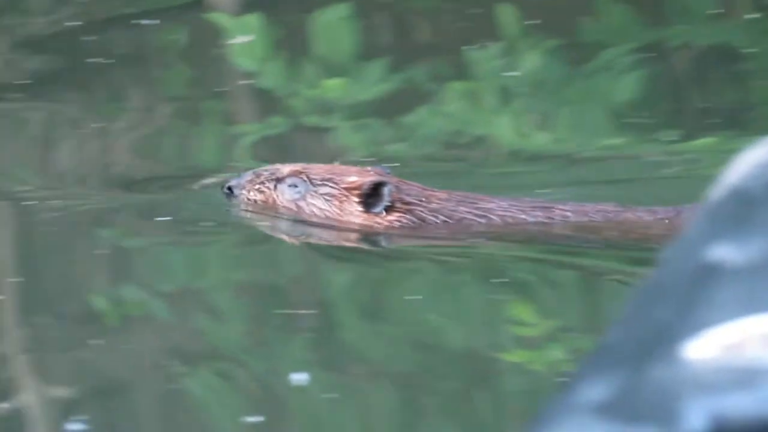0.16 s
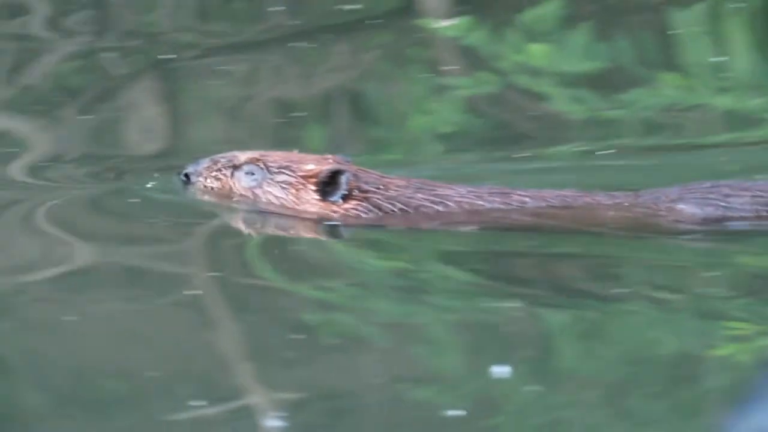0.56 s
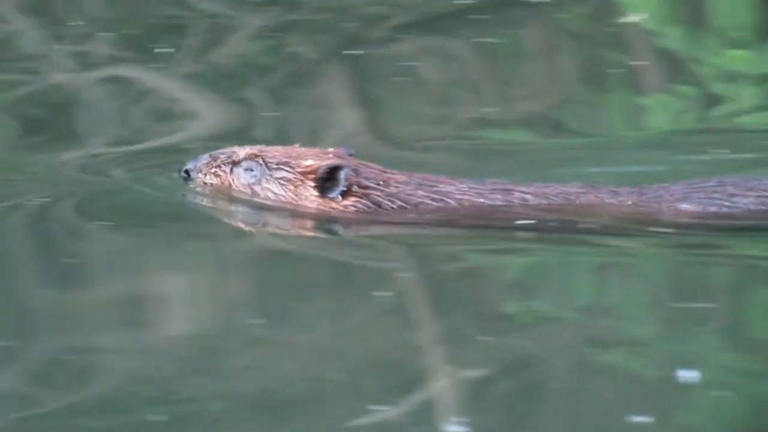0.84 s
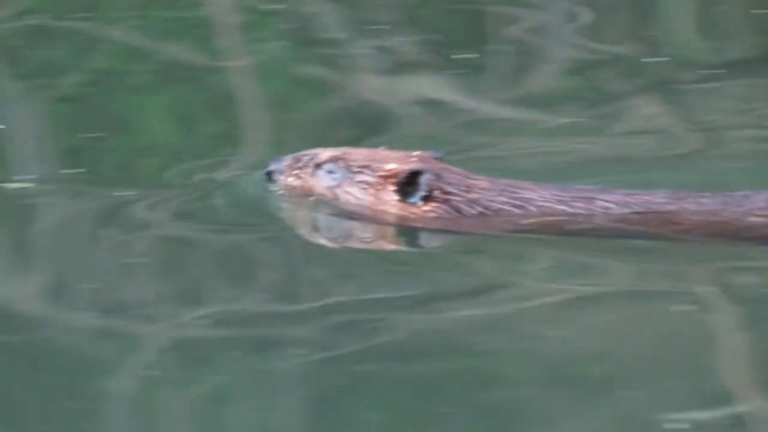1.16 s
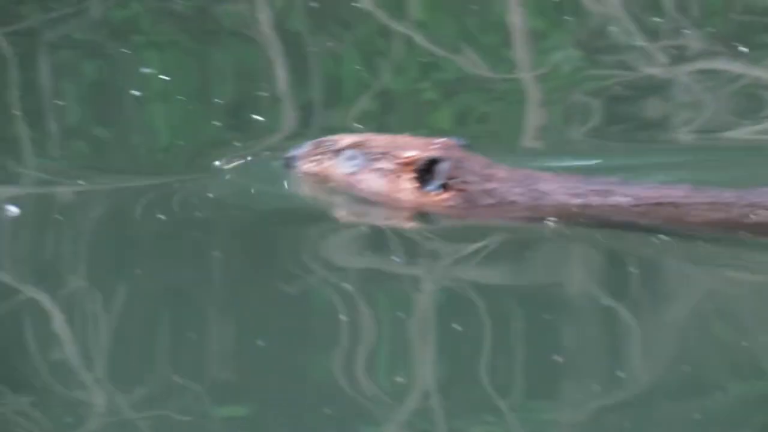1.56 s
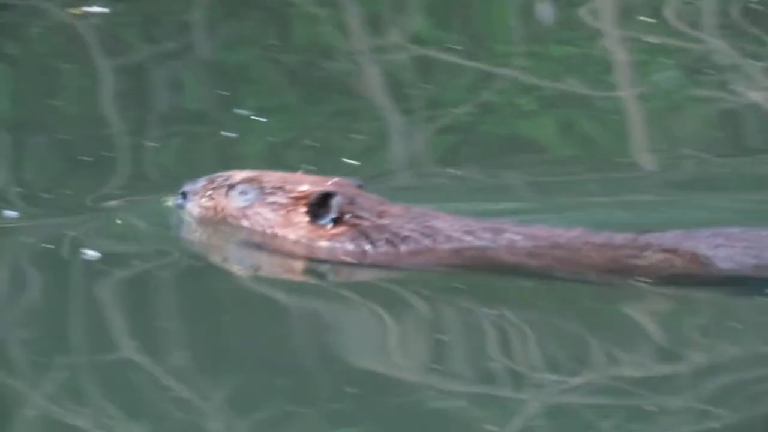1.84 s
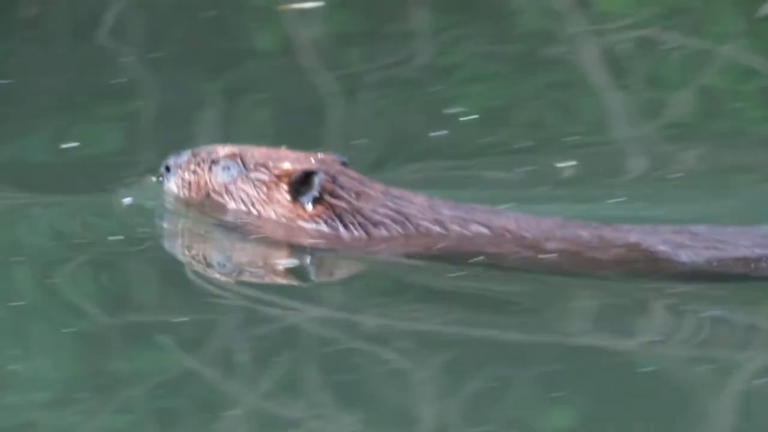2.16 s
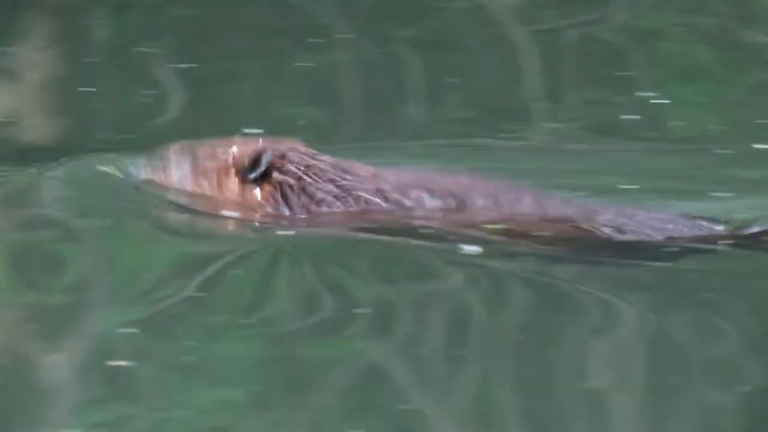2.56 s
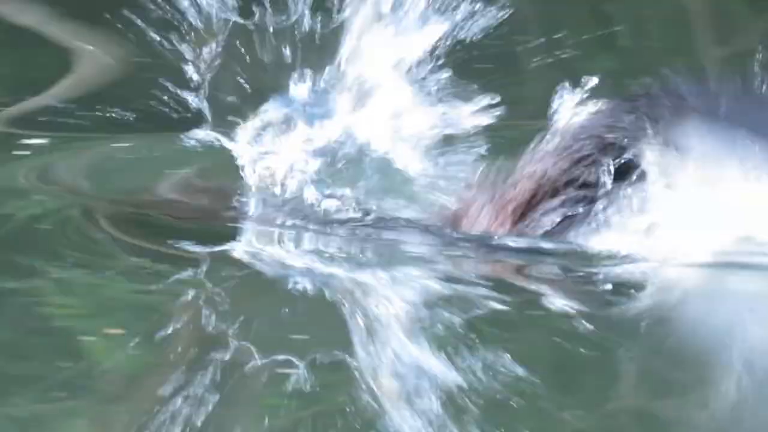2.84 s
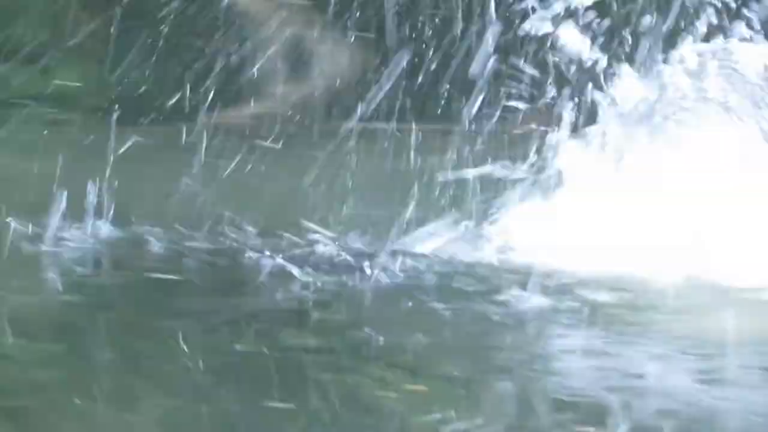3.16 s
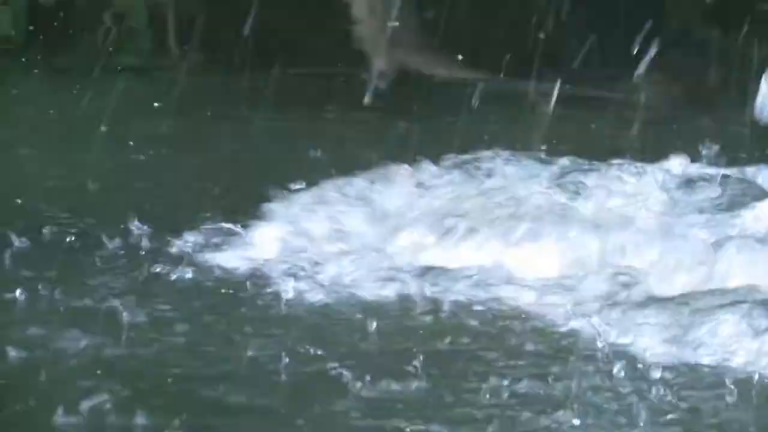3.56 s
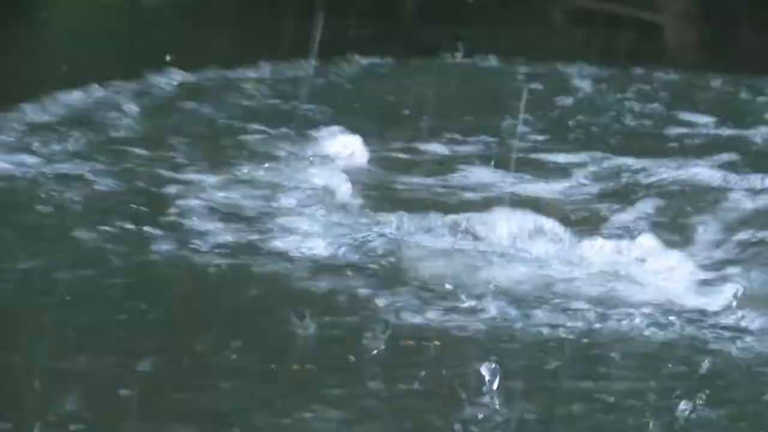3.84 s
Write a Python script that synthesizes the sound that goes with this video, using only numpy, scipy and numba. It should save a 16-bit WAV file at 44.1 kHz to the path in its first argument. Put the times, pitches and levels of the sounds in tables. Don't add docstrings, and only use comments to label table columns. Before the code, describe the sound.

A beaver's violent water slap breaks a quiet lake: faint hush, low hum and distant bird trill first, then small plips, a huge cracking splash, and spattering fallback, heard through a camera microphone outdoors.

```python
import sys
import numpy as np
from scipy import signal
from scipy.fft import rfft, irfft
from scipy.io import wavfile
from scipy.ndimage import uniform_filter1d
from numba import njit

SR = 44100
rng = np.random.default_rng(int(sys.argv[2]) if len(sys.argv) > 2 else 0)


def voltage_ratio(level):
    return 10 ** (np.asarray(level, float) / 20)


def unload_wav(signal):
    wavfile.write(
        sys.argv[1],
        SR,
        np.round(np.clip(np.atleast_2d(signal).T, -1, 1) * 32767).astype(np.int16),
    )


N = 176400

# start_s, churn_db, spray_db, bubble_hz
DIVE = [(2.685, -58, -85, 2000), (2.705, -55.5, -66, 2200), (2.745, -40, -56, 2130),
        (2.776, -49, -50, 2040), (2.802, -34.5, -48.5, 1540), (2.84, -39, -38.5, 1750),
        (2.86, -42.5, -39, 1500), (2.874, -32.5, -47, 1430), (2.901, -35, -39, 1510)]
SLAP = [(2.909, -20, -38, 1205), (2.93, -19, -23.5, 1450), (2.969, -22.5, -28.5, 1300),
        (3.015, -24, -31.5, 1200), (3.045, -25.5, -26, 1060), (3.065, -23, -28, 1050),
        (3.067, -25, -19.5, 1700), (3.089, -14.5, -16, 1610), (3.098, -25.5, -26, 900)]
FALLBACK = [(3.12, -29, -32.5, 890), (3.27, -27.5, -32, 933), (3.31, -27.5, -33.5, 1094),
            (3.47, -27, -30.5, 1430), (3.53, -30.5, -30.5, 1460), (3.625, -23.5, -26.5, 1100),
            (3.66, -24.5, -27, 1175), (3.829, -27, -27.5, 2020), (4.0, -37, -36.5, 2450)]
# start_s, level_db, pitch_hz, swell_ms, glide_oct_per_swell
BUBBLES = [(1.8795, -40.5, 1850, 1.5, -.15), (2.7258, -28, 700, 3.9, 0.12), (2.7295, -27, 865, 3.8, 0.41),
           (2.7425, -22.5, 1770, 1.3, 0.052), (2.7423, -23.5, 3100, 0.87, -0.093),
           (2.7458, -21.5, 1550, 1.4, -0.015), (2.758, -15, 1200, 2.3, 0.22),
           (2.796, -27.5, 2270, 1.1, 0.059), (2.804, -35, 1890, 3.8, 0.13), (2.863, -30, 686, 14.4, -0.35),
           (2.9, -10, 248, 11.7, 0.0034), (2.924, -13, 309, 7.7, 0.14),
           (2.918, -18.5, 118.3, 25.5, -0.0055), (3.139, -15, 546, 3.8, -0.033),
           (3.265, -33.5, 166.7, 60, 0.094), (3.615, -27, 478, 14, 0.016), (3.626, -16, 1014, 2.9, 0.099),
           (3.635, -30, 295, 19, 0.11), (3.708, -19, 1920, 2.1, -0.028), (3.872, -20, 2960, 1.7, 0.016),
           (3.923, -21, 1870, 1.8, 0.05)]
# start_s, level_db, pitch_hz, swell_ms
CRACKS = [(1.879, -29, 946, 0.27), (1.8792, -43, 3900, 0.15), (2.6965, -34, 3800, .2),
          (2.7045, -31, 11000, 0.065), (2.7335, -25, 9800, 0.072), (2.7257, -15, 4300, 0.15),
          (3.0688, -7.5, 11400, 0.52), (3.0702, -5, 8500, 0.24), (3.0702, -15, 2460, 0.34),
          (3.0812, -5, 1990, 0.17), (3.0827, -8.5, 2570, 0.34), (3.0829, -5, 5460, 0.16),
          (3.0876, -4.5, 1650, 0.39), (3.455, -13, 10200, 0.34), (3.523, -19, 5500, 0.5),
          (3.617, -10.5, 5300, 0.21), (3.629, -14, 4500, 0.75), (3.6745, -10.5, 5400, 0.28),
          (3.949, -15.5, 9200, 0.33), (3.961, -13, 12500, 0.15), (3.9715, -16, 7000, 0.58),
          (3.991, -15, 6000, 0.18)]
# start_s, level_db, pitch_hz
TICKS = [(2.7088, -41, 7660), (2.711, -52.0, 12400), (2.7259, -50.8, 13090), (2.7331, -42, 5340),
         (2.7393, -49.5, 9470), (2.7433, -29, 4000), (2.748, -33, 3960), (2.7966, -33, 4310),
         (2.797, -34, 12500), (2.8376, -30, 11710), (2.8405, -30, 7070), (2.8532, -32, 8100),
         (2.9058, -29, 12060), (2.9276, -12, 4000), (2.928, -24.5, 10510), (2.9345, -21, 4820),
         (2.9446, -27, 8700), (2.9548, -20.1, 7750), (3.0495, -15, 8500), (3.187, -21, 4480),
         (3.2665, -28.4, 11160), (3.2741, -21.4, 4650), (3.3278, -20.0, 5680), (3.4551, -16, 5960),
         (3.4831, -19.5, 7235), (3.5672, -29, 11890), (3.6144, -15, 14640), (3.6256, -14.5, 5510),
         (3.6724, -24.3, 14300), (3.7457, -23.0, 11890), (3.7773, -26, 14900), (3.8339, -15, 9130),
         (3.8415, -19, 7200), (3.8763, -30.2, 13780), (3.8771, -22, 9130), (3.9333, -20, 6660)]
# start_s, level_db, pitch_hz
POPS = [(2.9118, -26, 2470), (2.9194, -14, 1550), (2.9212, -19, 3000), (2.9274, -17, 2450),
        (2.9314, -15, 530), (2.9368, -31, 3180), (2.9386, -8.5, 1170), (2.9437, -20.5, 2620),
        (2.96, -15.3, 1030), (2.9956, -22, 1870), (3.0329, -27, 2766), (3.0445, -18, 1780)]
# start_s, level_db, pitch_hz
PLOPS = [(3.0951, -27, 2710), (3.1495, -15, 1110), (3.1582, -19, 590), (3.2333, -19, 1240),
         (3.2689, -18, 1080), (3.2736, -20.3, 990), (3.2772, -17, 520), (3.2895, -27, 3180),
         (3.4611, -24.3, 780), (3.5061, -21, 1520), (3.6034, -18, 1140), (3.6172, -22, 1560),
         (3.6988, -22, 3600), (3.7046, -20.5, 3140), (3.8044, -18, 2070), (3.8091, -18.5, 1240),
         (3.824, -18, 3360), (3.8697, -27, 1340), (3.8849, -31, 900), (3.9031, -28, 1870),
         (3.9263, -33, 1140), (3.9499, -27, 1560)]
# freq_hz, gain_db
MIC_COLOUR = [(100, -11), (1000, -1.5), (3350, 1.5), (3700, -1.5), (4600, 1.5), (8700, 1), (9500, -1.5),
              (15000, -2)]
# freq_hz, gain_db
MIC_BALANCE = [(700, 0), (1290, -3), (2380, -6), (4400, 1.5), (8120, 0), (15000, -3)]
# freq_hz, phase_rad
MIC_LEAD = [(2070, 0.016), (3450, 1.15), (3960, 0.12), (6460, -0.47), (10200, -1.32), (12300, -0.59),
            (15500, -1.4)]
# start_s, level_db, held_note_hz
PHRASES = [(.545, -71, 3150), (.685, -62, 3070), (.815, -58, 3040), (.941, -55.5, 3035), (1.085, -56, 3040),
           (1.225, -58, 3010), (1.367, -58.5, 2970), (1.52, -57.5, 2935), (1.67, -59, 2890),
           (1.845, -59, 2880), (1.976, -64, 2840)]
# delay_s, length_s, start_ratio, end_ratio, level_db
SYLLABLES = [
    (.003, .012, 1.22, 1.02, 1),
    (.017, .008, .92, .87, -9),
    (.025, .009, 1.26, 1.01, 3),
    (.031, .05, 1.03, 1.0, -4),
]
# start_s, length_s, pitch_hz, level_db
TSEEPS = [
    (.81, .04, 5050, -68),
    (.94, .045, 5020, -67),
    (1.085, .025, 5020, -69),
    (1.67, .07, 7600, -71),
    (2.01, .016, 2880, -57),
    (2.02, .02, 2500, -64),
]
# harmonic, level_db
HUM = [(1, -56.5), (4, -66), (5, -65.5), (6, -66.5), (8, -71.5), (9, -70), (12, -67), (13, -65)]
# time_s, pitch_hz, level_db
DRONE = [(0, 197, -57.5), (.5, 194.2, -56.5), (1.3, 193.3, -52), (4, 194.6, -51)]
# freq_hz, density_db
LAKE_COLOUR = [(18, -49), (30, -42), (48, -9.5), (197, -10), (270, -15.5), (747, -11), (830, -10.5),
               (945, -12.5), (15500, -40.5)]
# freq_hz, gain_db
LAKE_SIDE = [(60, -0.5), (400, 4), (1500, -5), (5000, 0)]

TICK_MS, POP_MS, PLOP_MS = 0.37, 1.22, 1.5
POP_GLIDE_OCT, PLOP_GLIDE_OCT = 0.023, 0.056
LOWEST_HZ = 300
CHURN_TOP_HZ, CHURN_SPREAD_OCT, CHURN_CYCLES, CHURN_GLIDE_OCT = 3900, 0.98, 1.65, 0.099
CHURN_SCATTER_DB, CHURN_WIDTH, CLUMP_DB, CLUMPS_PER_S = 1.9, 0.15, 1.6, 90
SPRAY_HZ, SPRAY_TOP_HZ, SPRAY_SPREAD_OCT, SPRAY_CYCLES = 7000, 21000, 0.83, 1.24
SPRAY_SCATTER_DB, SPRAY_WIDTH, GUST_DB, GUSTS_PER_S = 1.6, 0.35, 1.5, 160
SURGE_AT_S, SURGE_RISE_S, SURGE_DB, SURGE_T60_S, SURGE_HZ = 2.905, 0.0051, -25, 1.8, 260
SHORE_DB, SHORE_T60_S = -21, 0.033
TRILL_HZ, TRILL_DEPTH, TREES_DB, TREES_T60_S = 78, 0.4, 2.5, 0.7
HUM_HZ, LAKE_DB, LAKE_LAG_S, LAKE_LEFT_DB = 60.7, -54.5, 0.0002, 1.16
DUCK_AT_S, DUCK_DB, DUCK_ATTACK_S, DUCK_RELEASE_S = 3.085, -9.5, 0.012, 0.48
TOP_HZ, CLIP_LEVEL = 15750, 0.85

TIME_S = np.arange(N) / SR
BIN_HZ = np.arange(N // 2 + 1) * SR / N


def colour(x, gain):
    return irfft(rfft(x) * gain, N)


def curve(table):
    hz, value = np.array(table).T
    return np.interp(np.log(BIN_HZ + 1), np.log(hz), value)


def level(x, db):
    return x * voltage_ratio(db) / np.sqrt(np.mean(x ** 2))


def walk(rate_hz):
    hold = int(SR / rate_hz)
    steps = np.repeat(rng.standard_normal(N // hold + 1), hold)
    return 1.14 * uniform_filter1d(uniform_filter1d(steps, hold), hold)[:N]


def reverberate(x, t60_s):
    tail = rng.standard_normal((2, N)) * np.exp(-np.log(1000) * TIME_S / t60_s)
    return colour(x, rfft(tail) / np.sqrt(np.sum(tail[0] ** 2)))


@njit
def rings(n, start, hz, swell, glide, left, right):
    out = np.zeros((2, n))
    for k in range(len(start)):
        phase = 0.
        step = 2 * np.pi * hz[k] / SR
        bend = 2 ** (glide[k] / swell[k])
        first = int(start[k])
        for i in range(first + 1, min(n, first + int(4 * swell[k]) + 2)):
            u = (i - start[k]) / swell[k]
            phase += step
            step = min(step * bend, 2.8)
            s = u * np.exp((1 - u * u) / 2) * np.sin(phase)
            out[0, i] += left[k] * s
            out[1, i] += right[k] * s
    return out


def swarm(count, typical_hz, spread_oct, cycles, glide_oct, scatter_db, width, top_hz):
    when, rarity, edge = rng.random((count, 3)).T
    pitch_dev, swell_dev, pan_dev = rng.standard_normal((count, 3)).T
    first_s = DIVE[0][0]
    start_s = first_s + when * (N / SR - first_s)
    middle_hz = typical_hz(start_s)
    hz = middle_hz * 2 ** (spread_oct * pitch_dev)
    hz = np.clip(hz, LOWEST_HZ * (1 + edge), top_hz * 2 ** -edge)
    size = voltage_ratio(-scatter_db * np.log(rarity + 0.003)) * np.sqrt(hz / middle_hz)
    swell = cycles * 2 ** (0.5 * swell_dev) * SR / hz
    left, right = size * (1 + width * pan_dev), size * (1 - width * pan_dev)
    x = rings(N, start_s * SR, hz, swell, glide_oct * edge * 2, left, right)
    return x / np.sqrt(uniform_filter1d(np.mean(x ** 2, axis=0), size=4000) + 1e-9)


def churn():
    s, db, _, bubble_hz = np.array(DIVE + SLAP + FALLBACK).T
    x = swarm(6500, lambda t: np.interp(t, s, bubble_hz), CHURN_SPREAD_OCT, CHURN_CYCLES,
              CHURN_GLIDE_OCT, CHURN_SCATTER_DB, CHURN_WIDTH, CHURN_TOP_HZ)
    return x * voltage_ratio(np.interp(TIME_S, s, db) + CLUMP_DB * walk(CLUMPS_PER_S))


def spray():
    s, _, db, _ = np.array(DIVE + SLAP + FALLBACK).T
    x = swarm(24000, lambda t: np.full_like(t, SPRAY_HZ), SPRAY_SPREAD_OCT, SPRAY_CYCLES,
              0, SPRAY_SCATTER_DB, SPRAY_WIDTH, SPRAY_TOP_HZ)
    return x * voltage_ratio(np.interp(TIME_S, s, db) + GUST_DB * walk(GUSTS_PER_S))


def alike(rows, swell_ms, glide_oct):
    return [(*row, swell_ms, glide_oct) for row in rows]


def single_hits():
    cracks = np.c_[CRACKS, np.zeros(len(CRACKS))]
    ticks = alike(TICKS, TICK_MS, 0)
    pops = alike(POPS, POP_MS, POP_GLIDE_OCT)
    plops = alike(PLOPS, PLOP_MS, PLOP_GLIDE_OCT)
    s, db, hz, swell_ms, glide_oct = np.vstack([BUBBLES, cracks, ticks, pops, plops]).T
    return rings(N, s * SR, hz, swell_ms * SR / 1000, glide_oct, voltage_ratio(db), voltage_ratio(db))


def surge():
    age_s = TIME_S - SURGE_AT_S
    band = signal.butter(2, [SURGE_HZ / 2, SURGE_HZ * 2], "band", fs=SR, output="sos")
    heave = level(signal.sosfilt(band, rng.standard_normal(N)), SURGE_DB)
    return heave * np.clip(age_s / SURGE_RISE_S, 0, 1) * voltage_ratio(-60 * age_s.clip(0) / SURGE_T60_S)


def splash():
    x = churn() + spray() + single_hits() + surge()
    x = x + voltage_ratio(SHORE_DB) * reverberate(x, SHORE_T60_S)
    sides = np.array([[0.5], [-0.5]])
    gain = voltage_ratio(curve(MIC_COLOUR) + sides * curve(MIC_BALANCE))
    return colour(x, gain * np.exp(1j * sides * curve(MIC_LEAD)))


def whistle(start_s, length_s, start_hz, end_hz, db):
    x = np.zeros(N)
    u = np.linspace(0, 1, int(length_s * SR))
    i = int(start_s * SR)
    phase = 2 * np.pi * np.cumsum(start_hz + (end_hz - start_hz) * u) / SR
    x[i:i + len(u)] = voltage_ratio(db) * np.sqrt(np.sin(np.pi * u).clip(0)) * np.sin(phase)
    return x


def birds():
    x = np.zeros(N)
    for s, db, hz in PHRASES:
        for delay_s, length_s, start, end, part_db in SYLLABLES:
            x += whistle(s + delay_s, length_s, hz * start, hz * end, db + part_db)
    x = x * (1 + TRILL_DEPTH * np.sin(2 * np.pi * TRILL_HZ * TIME_S + 2 * walk(12)))
    for s, length_s, hz, db in TSEEPS:
        x += whistle(s, length_s, hz, 0.98 * hz, db)
    return x + voltage_ratio(TREES_DB) * reverberate(x, TREES_T60_S)


def motor_hum():
    turn = 2 * np.pi * np.cumsum(HUM_HZ + 0.118 * walk(2.98)) / SR
    x = np.zeros(N)
    for harmonic, db in HUM:
        waver_db = (0.6 if harmonic < 1.5 else 1.4) * walk(3.4)
        x += voltage_ratio(db + 2 + waver_db) * np.sin(round(harmonic) * turn + 6 * rng.random())
    return x


def far_drone():
    s, hz, db = np.array(DRONE).T
    pitch_hz = np.interp(TIME_S, s, hz) + 1.07 * walk(8.2)
    gain = voltage_ratio(np.interp(TIME_S, s, db) + 3.5 + 0.98 * walk(7.3))
    return gain * np.sin(2 * np.pi * np.cumsum(pitch_hz) / SR)


def lake():
    mid, side = colour(rng.standard_normal((2, N)), voltage_ratio(curve(LAKE_COLOUR)))
    gain = voltage_ratio(LAKE_DB + 0.42 * walk(0.77)) / np.std(mid)
    sides = np.array([[1], [-1]])
    wide = sides * colour(side, voltage_ratio(curve(LAKE_SIDE))) * gain
    x = mid * gain + motor_hum() + far_drone() + wide
    lag = np.exp(1j * np.pi * sides * LAKE_LAG_S * BIN_HZ)
    return colour(x * voltage_ratio(sides * LAKE_LEFT_DB / 2), lag)


def scene():
    return splash() + birds() + lake()


def band_limit(x):
    return signal.sosfilt(signal.butter(12, 16000, fs=SR, output="sos"), x)


def record(dry):
    age_s = TIME_S - DUCK_AT_S
    duck_db = DUCK_DB * np.clip(age_s / DUCK_ATTACK_S, 0, 1) * np.exp(-age_s.clip(0) / DUCK_RELEASE_S)
    clipped = (dry * voltage_ratio(duck_db)).clip(-CLIP_LEVEL, CLIP_LEVEL)
    lowpass = signal.ellip(8, 0.2, 60, TOP_HZ, fs=SR, output="sos")
    return band_limit(signal.sosfilt(lowpass, clipped))


dry = scene()
out = record(dry)
unload_wav(out)
```